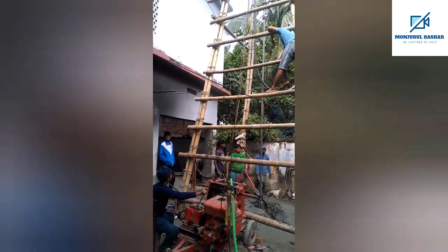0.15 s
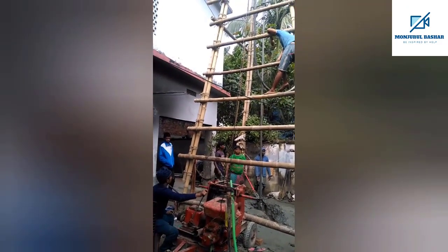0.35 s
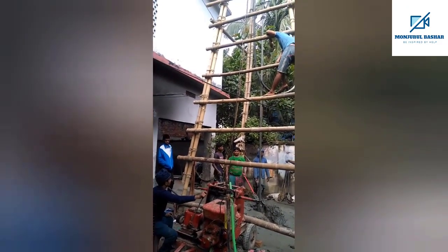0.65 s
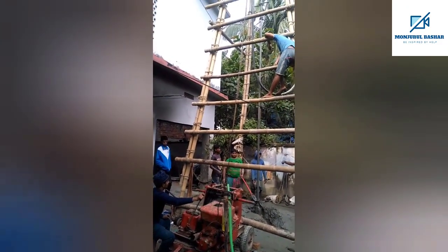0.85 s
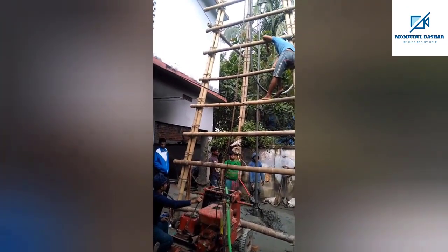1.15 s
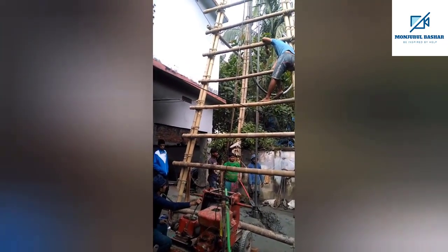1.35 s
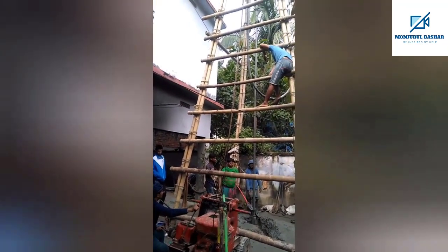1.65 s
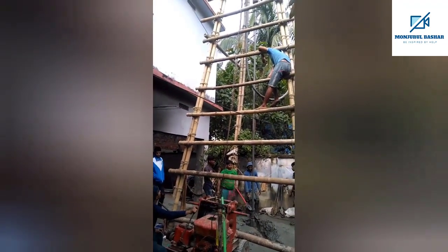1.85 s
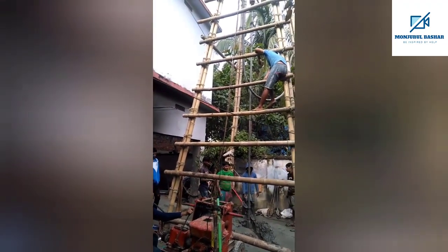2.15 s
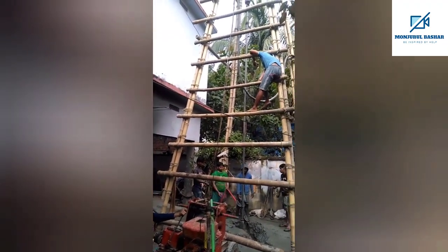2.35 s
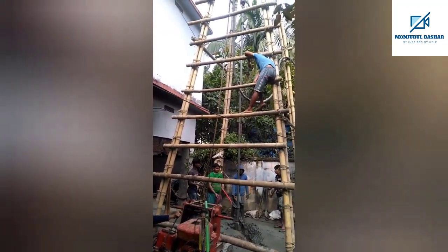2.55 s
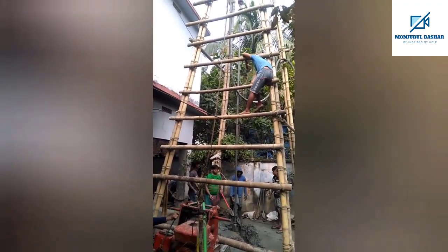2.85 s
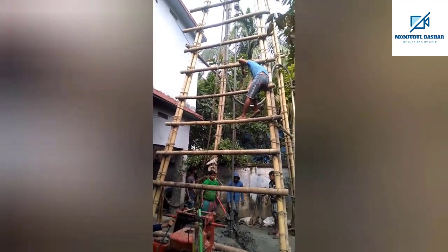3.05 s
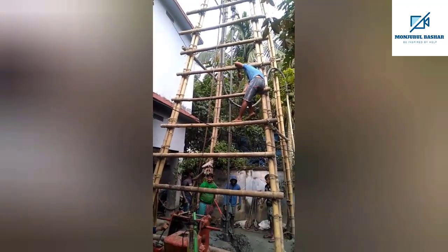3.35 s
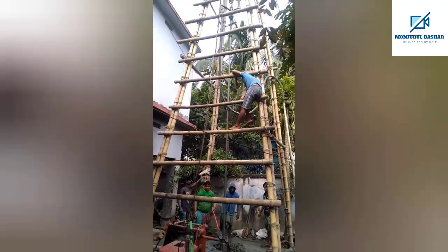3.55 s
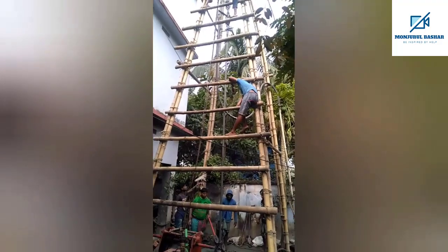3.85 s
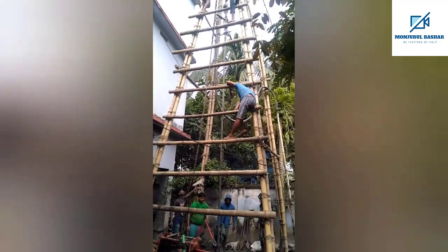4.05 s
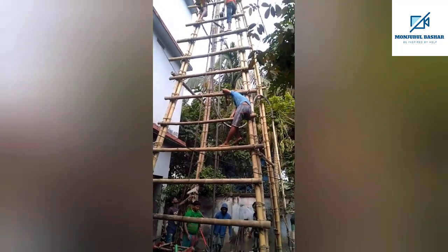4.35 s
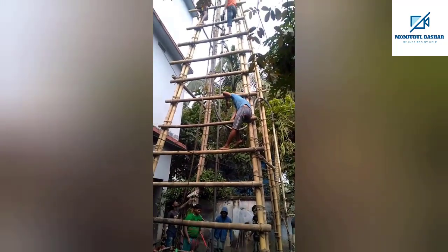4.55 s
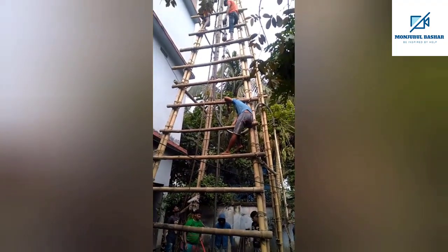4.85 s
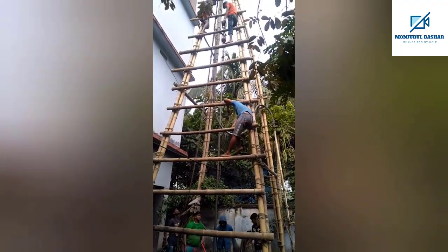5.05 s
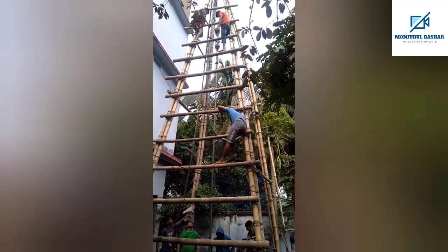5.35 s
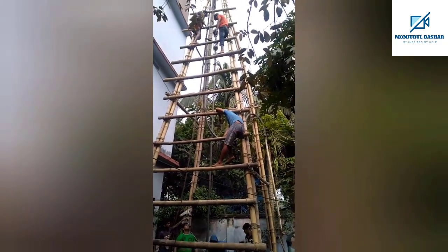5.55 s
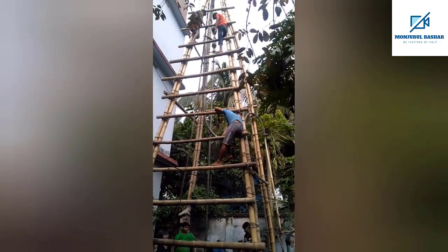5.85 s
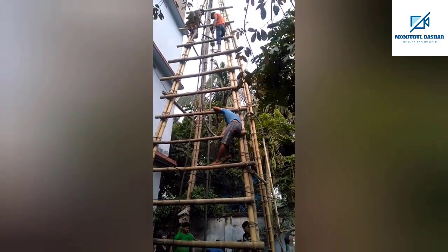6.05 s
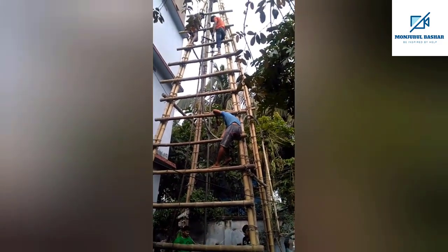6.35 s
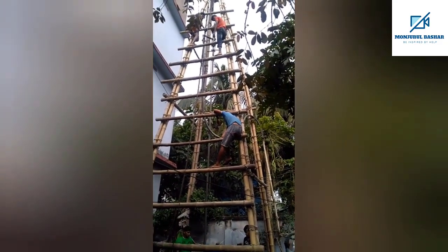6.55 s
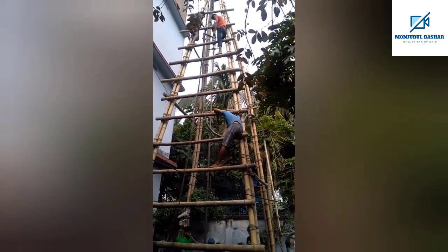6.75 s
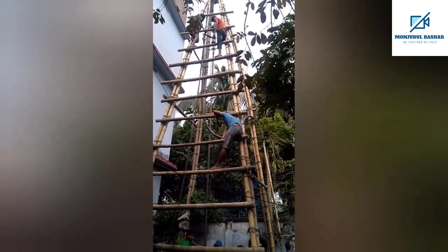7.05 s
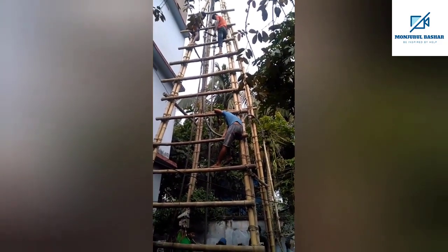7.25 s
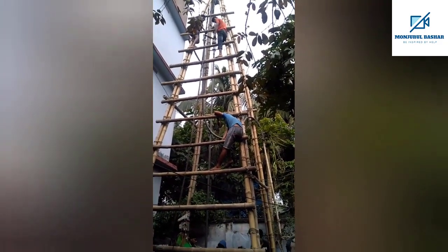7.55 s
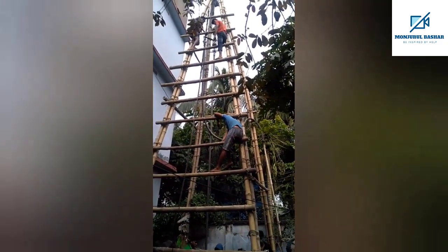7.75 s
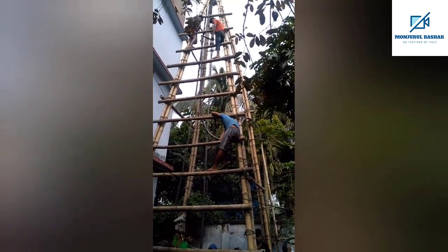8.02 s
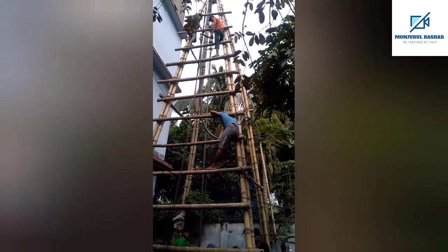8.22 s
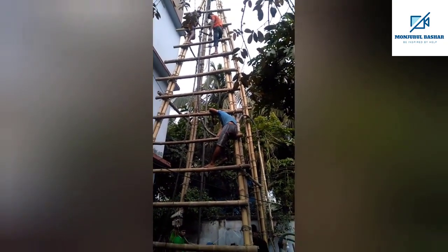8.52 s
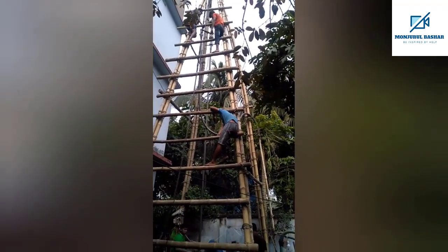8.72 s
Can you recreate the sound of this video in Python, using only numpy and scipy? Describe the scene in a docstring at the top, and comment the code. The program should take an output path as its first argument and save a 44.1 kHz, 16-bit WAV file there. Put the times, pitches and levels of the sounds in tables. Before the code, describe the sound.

A small single-cylinder diesel runs close by in a walled yard, firing about six and a half times a second. Each beat has a short hoarse honk of intake air, a dull knock, a bright tinny clang and a low puff. It sags slightly, then picks up near the end. Pump and belts churn quietly underneath, with a few hisses and faint metal rings. Stereo, close, with short wall reflections.

```python
"""A single-cylinder diesel chugs about six and a half times a second at a well-drilling rig in a yard.
Each cycle layers a wavering intake honk, noisy valve rattle, a sine knock, a clang of noise and ringing
modes, and a filtered exhaust puff with a boom. Decaying noise makes the walls' answer.
Coloured noise churns under it, with a few short hisses and faint rings; the parts' levels drift."""
import sys
import numpy as np
from scipy import signal
from scipy.fft import rfft, irfft, next_fast_len
from scipy.io import wavfile
from scipy.ndimage import uniform_filter1d, map_coordinates

SR = 44100
rng = np.random.default_rng(int(sys.argv[2]) if len(sys.argv) > 2 else 0)


def master(y):
    """Save y as 16-bit WAV."""
    cut = np.clip(np.atleast_2d(y).T, -1, 1)
    pcm = np.round(cut * 32767)  # scale
    wavfile.write(sys.argv[1], SR, pcm.astype(np.int16))


N = 391608  # samples in the scene
FRAME = 16384  # samples in one cycle's sound
LEAD = 2205  # samples of it ahead of the firing
T = (np.arange(FRAME) - LEAD) / SR  # seconds from the firing
HZ = np.fft.rfftfreq(FRAME, 1 / SR)

# The engine sags under load and picks up again: t/s, firing rate/Hz
ENGINE_SPEED = [(0.0, 6.574), (0.55, 6.581), (1.6, 6.452), (1.9, 6.335), (2.5, 6.213), (2.8, 6.342),
                (3.4, 6.39), (3.8, 6.318), (4.1, 6.148), (4.9, 6.262), (5.2, 6.348), (7.2, 6.41),
                (7.6, 6.761), (8.88, 6.808)]


def firing_times():
    """The crank turns at the changing speed and fires once at each whole cycle."""
    speed_hz = np.interp(np.arange(N) / SR, *np.transpose(ENGINE_SPEED))
    cycles_done = np.cumsum(speed_hz) / SR
    return np.searchsorted(cycles_done, np.arange(cycles_done[-1])) / SR


FIRINGS = firing_times()
CYCLES = len(FIRINGS)


def amp(db):
    """Level in dB to a linear gain."""
    return 10 ** (np.asarray(db) / 20)


def unit(x):
    """Scale to an rms of 1."""
    return x / np.sqrt(np.mean(x ** 2) + 1e-20)


def along(points, hz):
    """Read (f/Hz, value) points on a log frequency axis."""
    f, values = np.transpose(points)
    return np.interp(np.log(hz + 1), np.log(f + 1), values)


def each(values):
    """One value for each cycle, shaped to scale its sound."""
    return np.asarray(values)[:, None, None]


def at_firings(curve):
    """Each column of a curve, read at the firings."""
    times, *columns = np.transpose(curve)
    return [each(np.interp(FIRINGS, times, column)) for column in columns]


def on_nearest_firing(rows):
    """Rows of t/s, level/dB as extra dB for the cycles they fall on."""
    times, db = np.transpose(rows)
    nearest = np.abs(FIRINGS - times[:, None]).argmin(axis=1)
    return each(np.bincount(nearest, db, CYCLES))


def scatter():
    """One normal draw for each cycle."""
    return rng.standard_normal((CYCLES, 1, 1))


def wander(size, count):
    """A smooth random curve of count knots for each cycle."""
    knots = rng.standard_normal((CYCLES, 1, count))
    return unit(signal.resample(knots, size, axis=-1))


def wander_slowly(t, count=200):
    """A smooth random curve of count knots across the whole scene."""
    return map_coordinates(rng.standard_normal(count), [t / t[-1] * (count - 1)], mode="nearest")


def burst(start, rise, decay):
    """An envelope that swells at start and dies away; all times in seconds."""
    age = np.maximum(T - start, 0)
    return (1 - np.exp(-age / rise)) * np.exp(-age / decay)


# How alike left and right are: f/Hz, likeness/0-1
STEREO_LIKENESS = [(100, 0.94), (300, 0.91), (700, 0.74), (1200, 0.23), (3000, 0.067), (10000, 0)]


def noise(gain, hz, count):
    """Coloured stereo noise, rms 1 over all stretches, alike in the bass and unrelated in the treble."""
    draws = rng.standard_normal((2, count, len(hz), 2), dtype=np.float32)
    mid, side = draws.view(np.complex64)[..., 0]
    turn = np.arccos(np.clip(along(STEREO_LIKENESS, hz), -1, 1)) / 2
    mid, side = mid * np.cos(turn), side * np.sin(turn)
    left_right = np.stack([mid + side, mid - side], axis=1)
    return unit(irfft((left_right * gain).astype(np.complex64)))


def steady(colour, modes=()):
    """Stereo noise as long as the scene, raised or dipped at its resonances."""
    hz = np.fft.rfftfreq(next_fast_len(N + 2, True) // 2 * 2, 1 / SR)
    peaks_db = sum(db / (1 + (2 * (hz - centre) / width) ** 2) for centre, width, db in modes)
    return noise(amp(along(colour, hz) + peaks_db), hz, count=1)[0, :, :N]


# The parts' levels drift from second to second; churn() plays the last column, engine() the others.
# The exhaust column is relative: t/s, intake level/dB, knock level/dB, exhaust level/dB, churn level/dB
PART_LEVELS = [(0, -26, -28, -26.5, -40), (1, -26.5, -23.5, -28, -40.5), (2, -28, -26, -28.5, -43),
               (3, -27.5, -27, -28.2, -41.5), (4, -26.5, -22.5, -28, -41.5), (5, -32, -22.5, -27.5, -42),
               (6, -27, -28, -28, -41.5), (7, -28.5, -21.5, -27.5, -42.5), (8, -25, -22.5, -27.7, -46.5),
               (8.88, -24, -24, -28.5, -46)]
# Colour of the churn: f/Hz, relative level/dB
CHURN_COLOUR = [(20, -26), (45, -8), (120, -8.5), (170, 1), (260, 0.5), (335, 3), (410, -3.5), (530, -7.5),
                (830, 0), (1200, -8.5), (2200, -9.5), (5500, -25), (8000, -28.5), (15500, -51)]
# Resonances of the pump and frame: f/Hz, width/Hz, lift/dB
PUMP_FRAME_MODES = [(347, 12.4, 3.5), (534, 49, 8), (582, 17, -11), (790, 25, 4.5)]


def churn(slosh_db=3.0):
    """Pump and belts churn unevenly: resonant noise with a wandering level."""
    t = np.arange(N) / SR
    times, *_, churn_db = np.transpose(PART_LEVELS)
    slosh = unit(amp(slosh_db * unit(wander_slowly(t))))
    return amp(np.interp(t, times, churn_db)) * slosh * steady(CHURN_COLOUR, PUMP_FRAME_MODES)


# Short hisses at the rig: peak t/s, time from the peak to 1/e/s, level/dB
HISS_EVENTS = [(2.715, 0.085, -39.5), (4.367, 0.029, -41), (5.78, 0.014, -44), (5.853, 0.045, -33),
               (5.94, 0.027, -36)]
# Colour of the hisses: f/Hz, relative level/dB
HISS_COLOUR = [(700, -20), (1600, 7), (2500, -3), (4800, 6), (7000, -11), (15000, -32)]


def hisses():
    """Bright noise swells and fades under bell-shaped envelopes."""
    t = np.arange(N) / SR
    swells = sum(amp(db) * np.exp(-((t - peak) / length) ** 2) for peak, length, db in HISS_EVENTS)
    return swells * steady(HISS_COLOUR)


# Faint rings of loose metal: t/s, f/Hz, starting level/dB, t60/s
METAL_RINGS = [(1.378, 1152, -38, .45), (4.062, 1690, -39, 0.61), (5.814, 1680, -27, 0.2),
               (5.97, 2100, -37, 0.5), (6.128, 2210, -32, 0.29), (7.376, 2155, -37, 0.31),
               (7.524, 3040, -29, 0.22), (7.675, 3310, -36, 0.36), (8.118, 3510, -41, 0.95)]


def rings():
    """Loose metal rings as decaying sines, each at most half a second long."""
    out = np.zeros(N + SR)
    age = np.arange(SR // 2) / SR
    for start, hz, db, t60 in METAL_RINGS:
        ring = amp(db - 60 * age / t60) * np.sin(2 * np.pi * hz * age)
        out[round(start * SR):][:len(age)] += ring
    return out[:N]


def rig():
    """Pump, belts and loose metal form the bed under the engine."""
    return churn() + hisses() + rings()


# Decay of the yard: f/Hz, t60/s
YARD_DECAY = [(100, 0.32), (600, 0.36), (2000, 0.28), (6000, 0.31), (14000, 0.26)]


def yard_tails():
    """The spectrum of the walls' diffuse answer: noise dying at its own rate in each band."""
    edges = np.log([hz for hz, t60 in YARD_DECAY])
    white = noise(1, HZ, count=CYCLES).astype(np.float32)
    age = np.arange(FRAME) / SR
    tails = 0
    for share, (hz, t60) in zip(np.eye(len(YARD_DECAY)), YARD_DECAY):
        fade = amp(-60 * age / t60) * (1 - np.exp(-age / 0.0091))
        fade = (fade / np.linalg.norm(fade)).astype(np.float32)
        band = np.interp(np.log(HZ + 1), edges, share).astype(np.float32)
        tails = tails + rfft(white * fade) * band
    return tails


def boom(hz=195, start=0.01764, rise=0.0092, decay=0.018):
    """The long tail of the exhaust stroke sets the pipe's air column booming."""
    phase = 2 * np.pi * hz * (1 + 0.018 * scatter()) * (T - start)
    return amp(1.3 * scatter()) * burst(start, rise, decay) * np.sin(phase)


# The silencer's resonances: f/Hz, width/Hz, relative level/dB
SILENCER_MODES = [(60, 14, 0), (140, 23, 6.5)]
# The puff's paths through the pipe and off ground and walls: delay t/s, relative signed gain
PUFF_PATHS = [(0, .7), (.0063, -2), (.0207, 2.25), (.025, 2.55), (.0358, 1.65), (.061, .4)]


def exhaust(soft_hz=185, mouth_hz=36, unsteady_s=.0005):
    """One soft puff a cycle booms in the silencer and arrives by several paths."""
    silencer = 0
    for k, (centre, width, db) in enumerate(SILENCER_MODES):
        mode = 1j * HZ * width / (centre * centre - HZ ** 2 + 1j * HZ * width)
        silencer = silencer + (-1) ** k * amp(db) * mode  # neighbours in opposite phase
    open_end = (1j * HZ / (1j * HZ + 30)) ** 2
    open_end = open_end * (1 - 1 / (1 + (HZ / mouth_hz) ** 8))  # a pipe's mouth radiates no slow flow
    puff = silencer * open_end * np.exp(-(HZ / soft_hz) ** 2)
    arrivals = 0
    for delay, gain in PUFF_PATHS:
        arrivals = arrivals + gain * amp(0.48 * scatter()) * np.exp(-2j * np.pi * HZ * delay)
    opening = LEAD / SR + unsteady_s * scatter()
    return amp(.5 * scatter()) * irfft(puff * arrivals * np.exp(-2j * np.pi * HZ * opening), FRAME)


# Intake surges in each cycle, before scatter: t/s from the firing, starting f/Hz, relative level/dB, decay/s
INTAKE_SURGES = [(-.032, 878, 1, 0.0066), (-.0191, 824, -1, 0.012)]


def intake(wander_rad=0.88, rough=0.53, sag_per_s=0.45, pitch_scatter=0.021, phase_scatter_rad=0.61):
    """Air drawn through the filter honks hoarsely in two surges before each firing, sagging in pitch."""
    honk = 0
    stretch = 1 + pitch_scatter * scatter()
    for start, hz, db, decay in INTAKE_SURGES:
        age = np.clip(T - start, 0, None)
        turns = hz * stretch * (age - sag_per_s * age ** 2 / 2)
        phase = 2 * np.pi * turns + phase_scatter_rad * scatter()
        phase = phase + wander_rad * wander(FRAME, count=110)
        swell = burst(start + 0.0012 * scatter(), 0.0021, decay)
        honk = honk + amp(db + 0.53 * scatter()) * swell * np.sin(phase)
    return honk * (1 + rough * wander(FRAME, count=150))


def knock(hz=545, width_s=0.0034, wall=0.24, wall_delay_s=0.026):
    """The jump of cylinder pressure shakes the crankcase briefly; a wall returns a weaker swell."""
    phase = 2 * np.pi * hz * (1 + 0.034 * scatter()) * T + 1.63 * scatter()
    swell = np.exp(-(T / width_s) ** 2)
    swell = swell + wall * np.exp(-((T - wall_delay_s) / (2 * width_s)) ** 2)
    return amp(0.51 * scatter()) * swell * np.sin(phase)


# Colour of the valve rattle: f/Hz, relative level/dB
VALVE_COLOUR = [(200, -3), (600, -35), (1200, -6.5), (2200, -2.5), (3500, -9.5), (5800, -13.5),
                (8000, -19.5), (15500, -36)]


def valve_gear(grain_db=3):
    """Rockers and timing gears rattle harder as compression builds."""
    load = 0.68 * burst(-0.022, 0.0026, 0.062) + np.exp(-np.abs(T + 0.0029) / 0.0038)
    rattle = noise(amp(along(VALVE_COLOUR, HZ)), HZ, count=CYCLES)
    return rattle * load * amp(grain_db * wander(FRAME, count=200))


# Modes of the block, tank and guards: f/Hz, relative level/dB, t60/s
BLOCK_MODES = [(1265, -15.5, 0.19), (1481, -13, 0.094), (1654, -4.5, 0.062), (1850, -3.5, 0.048),
               (2032, -3, 0.042), (2264, -2.5, 0.043), (2350, -1.5, 0.038), (2550, -6, 0.032),
               (3030, -17, 0.024), (3370, -4, 0.042), (3540, -27, 0.11)]


def block(modes_db=-11, lead_db=-4, lead_decay_s=0.0094, detune=0.013):
    """The blow rings every mode at a new strength; one panel, picked anew, adds a short leading ring."""
    hz, db, t60 = np.transpose(BLOCK_MODES)[..., None]
    modes = amp(db - 60 * np.maximum(T, 0) / t60) * np.exp(2j * np.pi * hz * T)
    modes = modes * np.clip(T / 0.00097, 0, 1)
    count = 2 * len(BLOCK_MODES)  # a sine and a cosine for each mode
    strengths = rng.standard_normal((CYCLES, 2, count)) + rng.standard_normal((CYCLES, 1, count))
    body = strengths @ np.concatenate([modes.real, modes.imag]) / np.sqrt(2)
    phase = rng.uniform(0, np.pi / 2, (CYCLES, 2, 1))
    odds = amp(db.ravel())  # the strong modes take the lead most often
    lead_hz = each(rng.choice(hz.ravel(), CYCLES, p=odds / odds.sum())) * (1 + detune * scatter())
    panel = burst(0, 0.00012, lead_decay_s) * np.sin(2 * np.pi * lead_hz * T + phase)
    return (amp(modes_db) * body + amp(lead_db) * panel) * amp([[1], [-2]])  # left, right dB


# Colour of the crash at the left: f/Hz, relative level/dB
CRASH_LEFT = [(250, -8), (600, -9), (1150, -9), (1600, -1), (2000, 0.5), (2280, 1), (2600, -3),
              (2900, -4.5), (3600, -2.5), (5000, -13), (6600, -18), (9000, -20.5), (15500, -35.5)]
# Colour of the crash at the right: f/Hz, relative level/dB
CRASH_RIGHT = [(250, -21), (600, -3.5), (1250, -10.5), (1600, -5), (2000, -5), (2500, -1), (4400, -4),
               (5600, -1), (6500, -7.5), (7600, -16), (9000, -22), (15500, -34.5)]


def clang(clang_db, treble_db, patchy_db=3, grain_db=1.0, slap=0.26, wall=0.41,
          bright_scatter_db=1.45, crash_db=-1.0):
    """Each firing crashes through the dense modes of the tinware; the piston slaps, a wall echoes."""
    colour = amp([along(CRASH_LEFT, HZ), along(CRASH_RIGHT, HZ)])
    treble = np.clip((HZ - 2800) / 1400, 0, 1)
    tilt_db = (treble_db + bright_scatter_db * scatter()) * treble
    patches_db = patchy_db * wander(len(HZ), count=150)
    crash = noise(colour * amp(tilt_db + patches_db), HZ, count=CYCLES)
    blow = burst(-0.00019, 0.00099, 0.0093)
    blow = blow + slap * amp(3.5 * scatter()) * burst(0.00383, 0.00034, 0.0032)
    # a later, looser clatter
    blow = blow + 0.36 * amp(5.7 * scatter()) * burst(0.013 + 0.0025 * scatter(), 0.0015, 0.0079)
    blow = blow + wall * burst(0.0242, 0.0033, 0.0097)
    blow = blow * amp(grain_db * wander(FRAME, count=300))
    return amp(clang_db) * (amp(crash_db) * crash * blow + block())


def port_lag(x, lag_s=0.0002):
    """The honk, knock and puff reach the left microphone port a little before the right."""
    lead_and_lag = np.array([[1], [-1]])
    return irfft(rfft(x) * np.exp(1j * np.pi * HZ * lag_s * lead_and_lag), FRAME)


# The clang's slow drift: t/s, relative level/dB, treble tilt of the crash/dB
CLANG_LEVELS = [(0, -19.5, -0.7), (1.2, -19.5, -1), (2, -18.5, -2.5), (3.5, -19, -.8), (4.5, -17.5, -0.2),
                (5.3, -21, 1.5), (7.2, -23, 3.7), (8.88, -23, 1.2)]
# Offsets of single firings, below 0 weaker, above 0 harder, 0 as usual: t/s, level over the usual clang/dB
FIRING_OFFSETS = [(.91, -3.5), (1.68, -5.5), (1.84, 2.5), (2.8, 2), (3.9, -2.5), (4.38, 2), (5.81, 0),
                  (7.06, 1.5), (7.37, -3.5), (8.26, 2)]
# Cycles in which the valve gear clatters loosely: t/s, level over the usual rattle/dB
LOOSE_RATTLES = [(.46, 5), (1.37, 5.5), (2.8, 1), (3.42, 9.5), (3.74, 4.5)]


def engine(clang_scatter_db=0.56, valve_db=-41.5, valve_scatter_db=3, after_db=-3.5, after_scatter_db=1.53):
    """All parts sound once a cycle, each with its share of the yard's answer."""
    intake_db, knock_db, exhaust_db, _ = at_firings(PART_LEVELS)
    usual_db, treble_db = at_firings(CLANG_LEVELS)
    harder_db = clang_scatter_db * scatter()  # firings differ in strength
    clang_db = usual_db + harder_db
    honk = amp(intake_db) * intake()
    thud = amp(knock_db) * knock()
    # each dB of harder blow takes one dB off the crash's treble tilt
    metal = amp(on_nearest_firing(FIRING_OFFSETS)) * clang(clang_db, treble_db - harder_db)
    rattle_db = valve_db + valve_scatter_db * scatter() + on_nearest_firing(LOOSE_RATTLES)
    rattle = amp(rattle_db) * valve_gear()
    puff = amp(exhaust_db) * (amp(48.5) * exhaust() + amp(1.0) * boom())

    # left and right balance in dB
    low = honk * amp([[-1], [.5]]) + thud * amp([[-1], [.7]]) + puff * amp([[-.3], [.2]])
    direct = port_lag(low) + metal + rattle

    # what each part sends to the yard; a louder clang leaves relatively less after-ring
    sent = amp(-1.5) * honk + amp(-3.0) * thud + amp(-3.5) * rattle + amp(-11) * puff
    ring_db = after_db + after_scatter_db * scatter() - 0.33 * (clang_db - clang_db.mean())
    sent = sent + amp(ring_db) * metal
    cycles = direct + irfft(rfft(sent.astype(np.float32)) * yard_tails())

    out = np.zeros((2, N + 2 * FRAME))
    for start, cycle in zip(FIRINGS, cycles):
        out[:, max(round(start * SR), 0):][:, :FRAME] += cycle
    return out[:, LEAD:LEAD + N]


def scene():
    """The engine over the bed of the rig."""
    return engine() + rig()


def record(dry, top=0.29, top_hz=15900):
    """The recorder rounds off the tallest peaks and keeps nothing above its band limit."""
    rounded = dry / (1 + (dry / top) ** 4) ** (1 / 4)
    size = next_fast_len(N + FRAME)
    in_band = np.fft.rfftfreq(size, 1 / SR) < top_hz
    return irfft(rfft(rounded, size) * in_band, size)[:, :N]


dry = scene()
out = record(dry)
master(out)
```